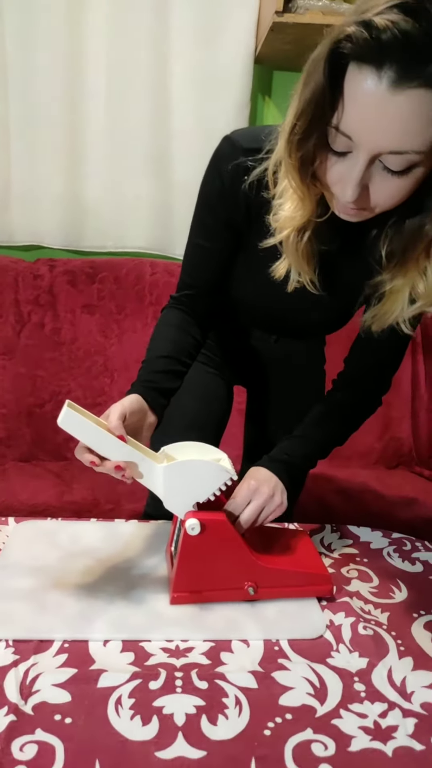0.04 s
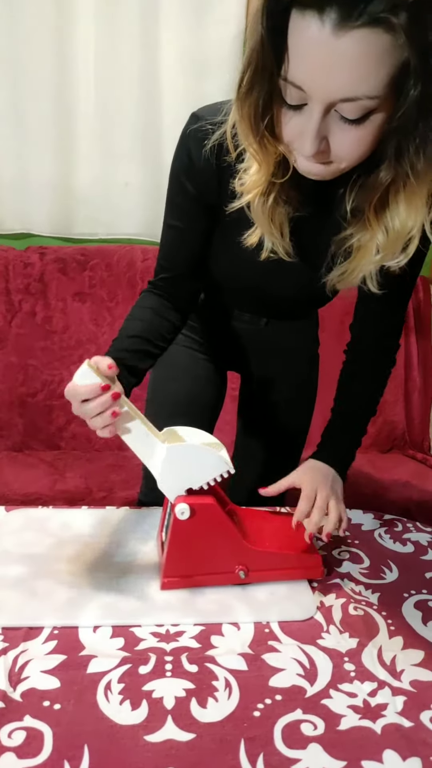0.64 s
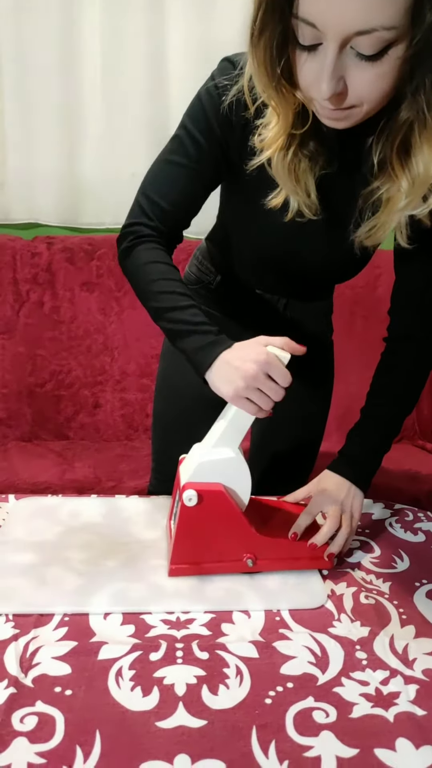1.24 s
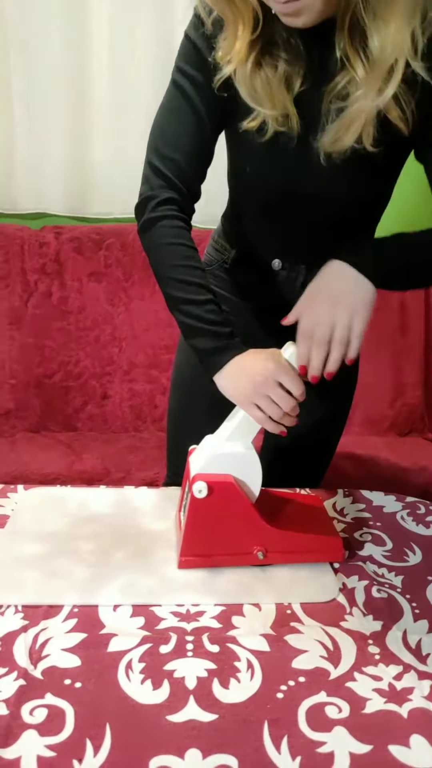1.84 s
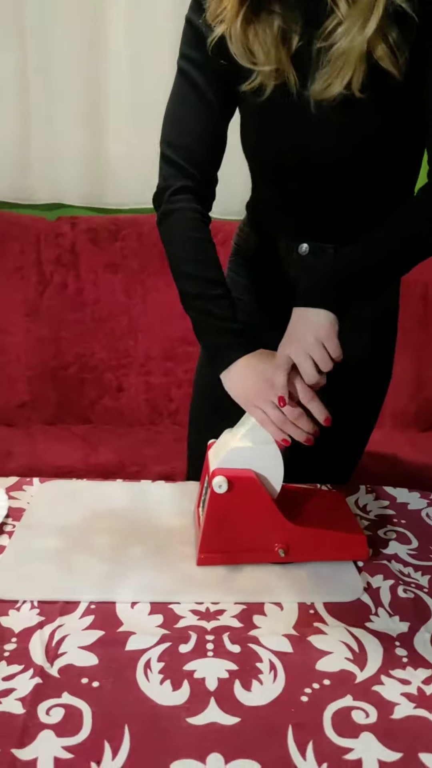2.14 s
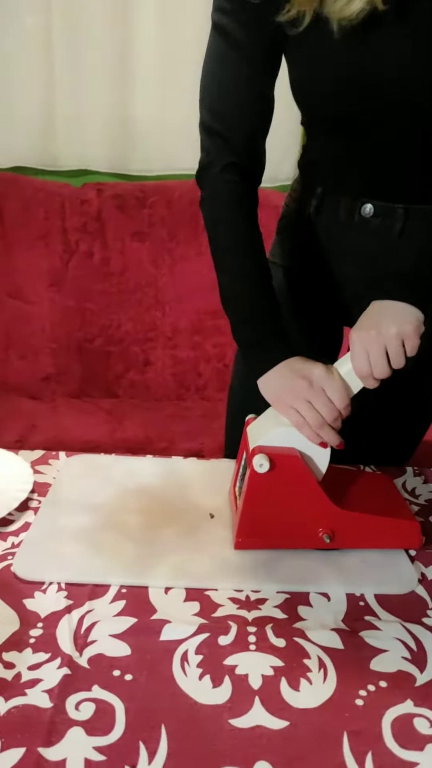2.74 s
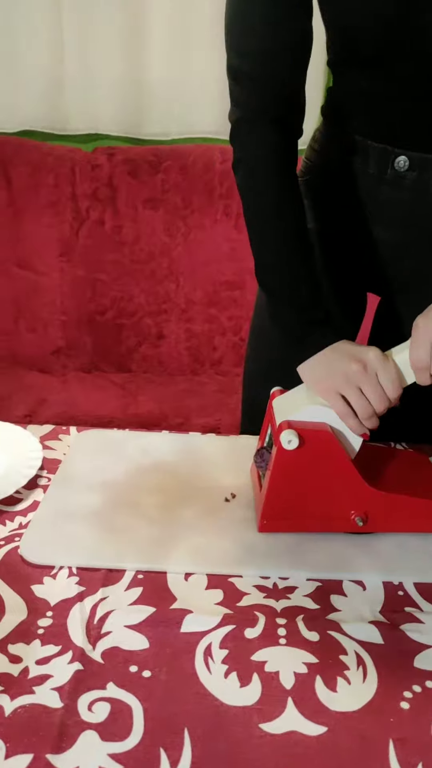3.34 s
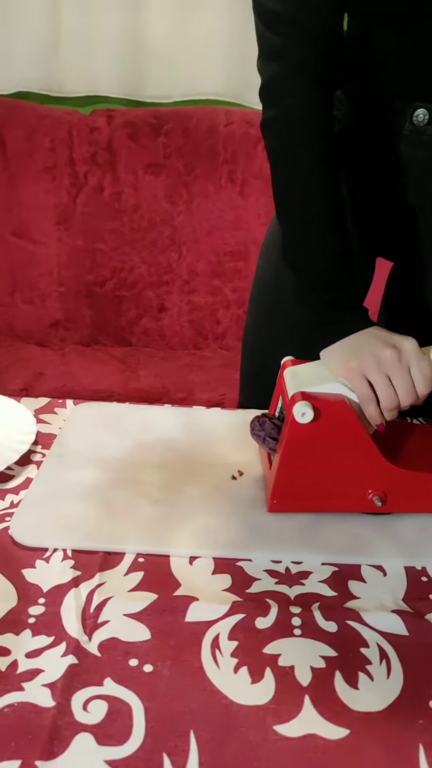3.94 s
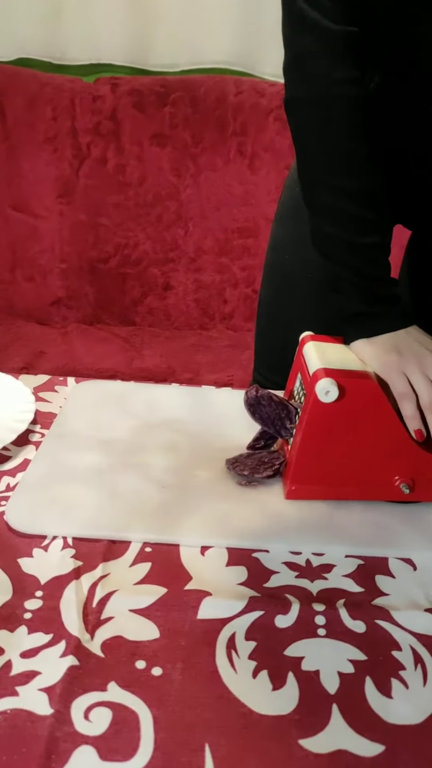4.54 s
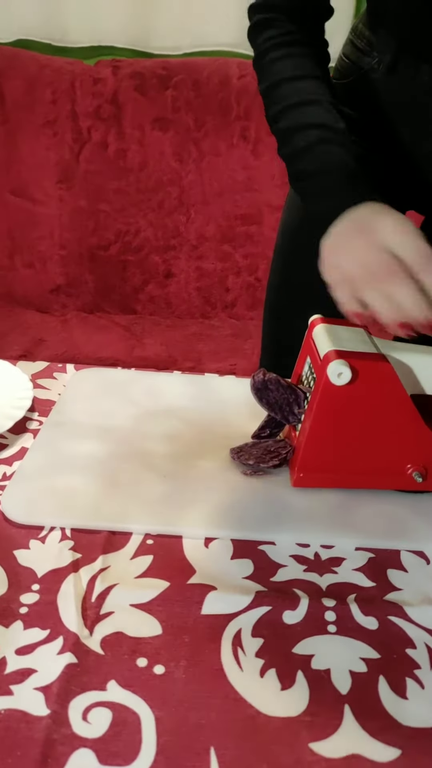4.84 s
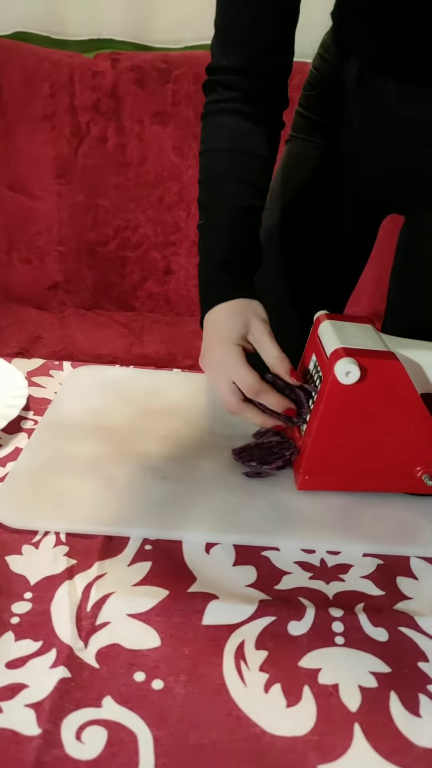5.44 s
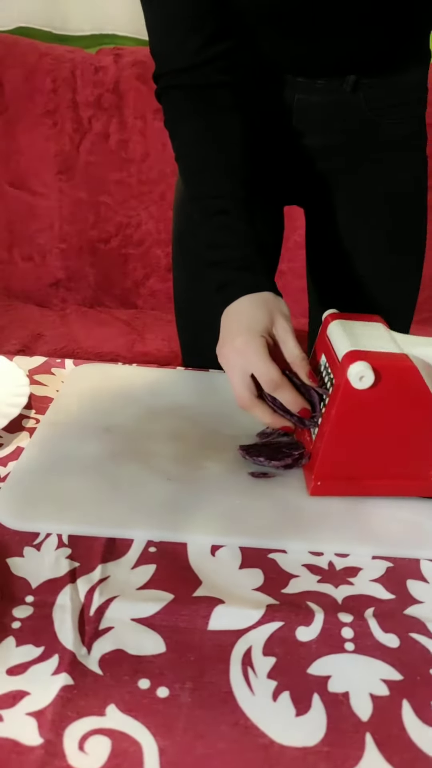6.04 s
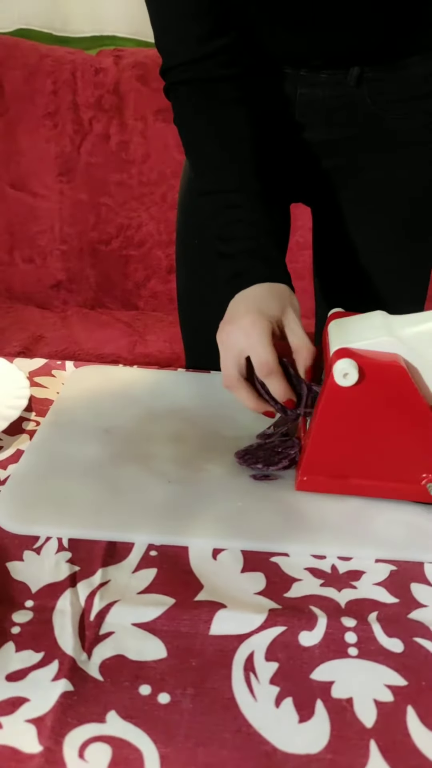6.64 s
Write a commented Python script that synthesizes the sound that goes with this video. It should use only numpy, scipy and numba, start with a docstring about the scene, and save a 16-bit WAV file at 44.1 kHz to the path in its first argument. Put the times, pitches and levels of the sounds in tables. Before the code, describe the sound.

A plastic lever cutter is heard close up on a table in a small, quiet living room that rings briefly. It starts with a light hollow knock, and a few more knocks, ticks and faint scrapes come around 1 to 1.7 seconds as the lever is seated. From about 2.4 seconds a raw potato begins giving way on the blades with a thud and short wet crunches, then a brief groan near 2.8. The loudest jolts come at 3.1 and 3.7 seconds, each a sharp thud with a juicy crunch, a frame shudder and a low table thump, with faint rubbing between. Smaller crunching slips follow around 4 to 4.2. After a quieter stretch with a faint squeak, a plastic knock and click sound at 5.7. Until about 6.6 seconds fingers pluck at the cut sticks with soft taps, ticks, rubbing and a faint creak.

```python
"""Small living room: close by, a plastic lever cutter on a table forces a raw potato through its blades.
The lever knocks as it is seated. The potato groans on the grid and gives way in slips that thud,
shake the frame and thump the table, while its cells burst with a wet crunch.
Then fingers pluck at the cut sticks. The room rings briefly."""
import sys
import numpy as np
from scipy import signal
from scipy.fft import rfft, irfft
from scipy.io import wavfile
from scipy.ndimage import uniform_filter1d, minimum_filter1d
from numba import njit

SR = 44100
rng = np.random.default_rng(int(sys.argv[2]) if len(sys.argv) > 2 else 0)


def pcm_store(signal):
    """Save signal as 16-bit PCM."""
    levels = np.round(np.clip(np.atleast_2d(signal), -1, 1) * 32767)
    wavfile.write(sys.argv[1], SR, levels.astype(np.int16).T)


N = 294588

# Event levels are relative, ahead of each layer's gain.
# potato slips: t/s, length/s, thud/dB, shudder/dB, crunch/dB, fizz/dB
POTATO_SLIPS = [(2.431, 0.029, -15, -19, -34, -45), (2.479, 0.026, -49, -33.5, -32.5, -37),
                (2.575, 0.023, -31.5, -35.5, -28.5, -34.5), (2.75, 0.053, -52.5, -49.5, -36.5, -37.5),
                (2.945, .018, -63, -67.5, -51, -46.5), (3.082, 0.022, -0.5, -7.5, -14.5, -30.5),
                (3.126, 0.017, -18, -19.5, -31, -43), (3.709, 0.033, -1, -10, -22, -29.5),
                (3.824, 0.026, -21, -20.5, -33.5, -43.5), (4.038, 0.071, -11, -19, -28.5, -35),
                (4.149, 0.012, -14.5, -23, -31.5, -34)]
# lever and frame knocks: t/s, level/dB, f/Hz, shudder/dB, scrape/dB
LEVER_KNOCKS = [(.118, -27, 443, -38.5, -44.5), (0.273, -53.5, 477, -54.5, -75),
                (.463, -52, 910, -68, -56.5), (.889, -45.5, 527, -57, -77), (1.053, -41, 1180, -52, -45.5),
                (1.093, -32.5, 488, -49, -49.5), (1.138, -31.5, 480, -34.5, -49),
                (1.395, -45, 496, -51, -62), (4.671, -37.5, 500, -53.5, -71), (5.716, -24.5, 463, -27, -44)]
# spectrum of juicy fizz, hiss and tick edges: f/Hz, level/dB
FIZZ_SPECTRUM = [(1000, -30.5), (3000, -4.5), (3700, -9), (4700, -3), (5900, -6.5), (7600, 3.5), (8900, 1),
                 (9700, -15.5), (12000, -22), (15500, -28.5)]
# friction spectrum: f/Hz, level/dB
RUB_SPECTRUM = [(100, -3.5), (300, -4), (520, -2.5), (1100, 2.5), (1700, -5.5), (2500, -4), (3400, -23),
                (8000, -28.5), (12000, -45.5)]


def jolts(tail):
    """Each slip lurches the lever: a thud, higher when harder, a table thump and a frame shudder."""
    # table modes: f/Hz, level/dB, t60/s
    table_modes = [(52.4, -6, 0.22), (95.7, -1, .26), (155, 5, 0.18)]
    stroke_end_s, lean_db_per_s = 4.6, 3  # weight on the table grows through the stroke
    thuds, shake, thumps = np.zeros((3, N))
    t = seconds(.3)
    thump = sum(amp(db) * bump(hz, t60_s, push_s=.012) for hz, db, t60_s in table_modes)
    for s, length_s, db, shudder_db, _, _ in POTATO_SLIPS:
        thud_hz = 825 * 2 ** (.021 * db)
        add(thuds, s, amp(db) * bump(thud_hz, t60_s=.011, push_s=.0028))
        shudder_s = .024 + .81 * length_s
        add(shake, s, amp(shudder_db) * np.tanh(t / .0027) * np.exp(-2 * t / shudder_s))
        thump_db = -29 + .57 * db - lean_db_per_s * (stroke_end_s - s)
        add(thumps, s, amp(thump_db) * thump)
    body, ringing = frame(shake * grains(per_s=2500, scatter_db=4), modes_db=-5)
    return in_room(thuds, tail, wet_db=-7) + in_room(body, tail, wet_db=-6) + ringing + thumps


def tearing(tail):
    """Cells burst on the blades in clusters: coarse crunch and a fine spray of juicy clicks."""
    crunch_rows = [(s, length_s, db) for s, length_s, _, _, db, _ in POTATO_SLIPS]
    fizz_rows = [(s, length_s, db) for s, length_s, _, _, _, db in POTATO_SLIPS]
    crunch_envelope = tear_envelope(crunch_rows, attack_s=.0027, strain_db=-14.5, snap_db=-8)
    fizz_envelope = tear_envelope(fizz_rows, attack_s=.004, strain_db=-27, snap_db=3.5)
    clusters = cell_clusters(per_s=300, spread_db=7)
    coarse = crunch_envelope * clusters * grains(per_s=900, scatter_db=2)
    spray = fizz_envelope * clusters * grains(per_s=600, scatter_db=7)
    # tearing flesh: f/Hz, level/dB
    crunch_spectrum = [(100, -15), (300, -5.5), (700, -1.5), (1300, -6), (1900, -1.5), (2600, -1.5),
                       (3300, -17.5), (5000, -22), (9000, -28), (12000, -54)]
    crunch = amp(-9) * convolve(coarse, colour(crunch_spectrum))
    fizz = amp(-5) * convolve(spray, colour(FIZZ_SPECTRUM))
    return in_room(crunch, tail, wet_db=5) + in_room(fizz, tail, wet_db=2.5)


def tear_envelope(rows, attack_s, strain_db, snap_db):
    """Flesh strains, snaps, rips during the slip, then settles. Rows: t/s, length/s, level/dB."""
    lead_s, strain_s, snap_s, release_s = .06, .011, .0028, .007
    envelope = np.zeros(N)
    t = seconds(.4) - lead_s
    after = t.clip(0)
    for s, length_s, db in rows:
        strain = amp(strain_db) * np.exp(-np.abs(t) / strain_s)
        snap = amp(snap_db) * (t > 0) * np.exp(-after / snap_s)
        rip = np.tanh(after / attack_s) * np.exp(-(t - length_s).clip(0) / release_s)
        add(envelope, s - lead_s, amp(db) * (strain + snap + rip))
    return envelope


def cell_clusters(per_s, spread_db):
    """Cells fail in groups: a gain that jumps at random moments, rms 1."""
    cluster = np.cumsum(rng.random(N) < per_s / SR)
    gain = amp(spread_db * rng.uniform(-1, 1, N))[cluster]
    return gain / np.sqrt(np.mean(gain ** 2))


def ticks_and_cracks(tail):
    """Plastic ticks, and a crack opens each slip: noise in a fast-dying resonance, bright-edged."""
    # hard plastic ticks: t/s, level/dB, f/Hz
    plastic_ticks = [(.463, -40.5, 1400), (1.053, -40, 4500), (1.451, -35, 2100), (1.740, -38.5, 1530),
                     (2.074, -51, 3400), (5.715, -23.5, 1210), (5.928, -36.5, 4120), (6.438, -47.5, 3400)]
    crack_hz, crack_re_thud_db = 1170, -6.5
    rows = plastic_ticks + [(s, db + crack_re_thud_db, crack_hz) for s, _, db, _, _, _ in POTATO_SLIPS]
    clicks, edges = np.zeros((2, N))
    t = seconds(.01)
    for s, db, hz in rows:
        burst = rng.standard_normal(len(t)) * np.exp(-t / .0016)
        tick = signal.fftconvolve(burst, ring(hz, t60_s=3 / hz))
        add(clicks, s, amp(db) * tick / np.abs(tick).max())
        add(edges, s, amp(db) * burst)
    return in_room(clicks + amp(-18) * convolve(edges, colour(FIZZ_SPECTRUM)), tail, wet_db=-11.5)


def knocks(tail):
    """The lever meets its seat or the potato: a hollow knock and a brief shudder."""
    hits, shake = np.zeros((2, N))
    for s, db, hz, shudder_db, _ in LEVER_KNOCKS:
        add(hits, s, amp(db) * bump(hz, t60_s=.038, push_s=.0018))
        add(shake, s, amp(shudder_db) * np.exp(-seconds(.11) / .011))
    body, ringing = frame(shake * grains(per_s=3300, scatter_db=.5), modes_db=-7)
    return in_room(hits + body, tail, wet_db=-2) + ringing


def frame(force, modes_db):
    """The loose-jointed frame under a force: dull broadband body and ringing modes."""
    # frame modes: f/Hz, level/dB
    frame_modes = [(157, 1), (199, -4), (288, -6), (344, -1.5), (457, 5.5), (512, -3), (648, -4), (716, -7),
                   (862, -1), (930, -6), (1020, -7.5), (1421, -14), (1528, -5.5), (1671, -23.5),
                   (1825, -16.5), (1912, -7.5), (2324, -15), (2606, -11.5)]
    # broadband frame response: f/Hz, level/dB
    shudder_spectrum = [(30, -37), (80, -21), (125, -1.5), (200, 1.5), (280, -6), (600, -7.5), (1000, -2),
                        (1350, -14.5), (1900, -7.5), (2600, -22.5), (3300, -37), (8000, -36.5),
                        (11000, -65)]
    modes = sum((-1) ** k * amp(db) * ring(hz, t60_s=.25) for k, (hz, db) in enumerate(frame_modes))
    return convolve(force, colour(shudder_spectrum)), amp(modes_db) * convolve(force, unit(modes))


def taps(tail):
    """Fingers and limp potato sticks bump the frame and board; low taps ring longer."""
    # soft taps: t/s, level/dB, f/Hz
    soft_taps = [(1.405, -49, 162), (1.96, -53, 170), (5.131, -46, 400), (5.694, -44.5, 594),
                 (5.931, -25, 549), (6.012, -24, 530), (6.019, -31, 189.5), (6.173, -27.5, 561),
                 (6.251, -31.5, 860), (6.345, -29.5, 624), (6.444, -37.5, 756), (6.508, -39, 480),
                 (6.571, -44.5, 187)]
    sound = np.zeros(N)
    for s, db, hz in soft_taps:
        t60_s = .013 * (547 / hz) ** 1.78
        add(sound, s, amp(db) * bump(hz, t60_s, push_s=.0033))
    return in_room(sound, tail, wet_db=-5.5)


def groans(tail):
    """Uneven stick-slip pulses ring one resonance per groan or squeak."""
    # potato on blades, fingers on lever and wet sticks: t/s, length/s, level/dB, f/Hz
    stick_slips = [(1.282, .036, -41, 620), (1.83, 0.032, -62, 2170), (2.315, 0.025, -49, 940),
                   (2.752, .043, -30, 935), (4.795, 0.21, -56, 2266), (6.142, 0.032, -39, 650),
                   (6.27, 0.33, -47.5, 528)]
    t60_cycles = 16
    pulses = grains(per_s=1600, scatter_db=1)
    sound = np.zeros(N)
    for s, length_s, db, hz in stick_slips:
        gated = pulses * bursts([(s, length_s, db)], edge_s=.0022)
        drive = gated[int(s * SR):int((s + length_s) * SR)]
        add(sound, s, signal.fftconvolve(drive, unit(ring(hz, t60_cycles / hz))))
    return in_room(amp(-6.5) * sound, tail, wet_db=-3.5)


def rubbing(tail):
    """Light friction, in strokes and after each knock: a grainy scrape under a thin hiss."""
    # plastic, potato and hands sliding: t/s, length/s, scrape/dB, hiss/dB
    slides = [(.093, .026, -54.5, -62), (1.246, .13, -55, -62), (1.527, 0.14, -62, -70),
              (1.83, 0.95, -81, -73.5), (2.39, 0.073, -51, -53), (2.96, 0.33, -61, -58.5),
              (3.352, 0.27, -59, -57.5), (4.332, 0.037, -49, -80), (4.797, .22, -70, -69.5),
              (5.21, 0.5, -68, -73), (5.926, 0.017, -42.5, -47), (6.132, 0.045, -52.5, -59.5),
              (6.216, .16, -61, -70), (6.429, 0.11, -53, -69.5)]
    knock_slide_s, hiss_re_scrape_db = .03, -8
    strokes = slides + [(s, knock_slide_s, db, db + hiss_re_scrape_db) for s, *_, db in LEVER_KNOCKS]
    scrape_envelope = bursts([(s, length_s, db) for s, length_s, db, _ in strokes], edge_s=.00285)
    hiss_envelope = bursts([(s, length_s, db) for s, length_s, _, db in strokes], edge_s=.0048)
    scrape = convolve(scrape_envelope * grains(per_s=790, scatter_db=4.5), colour(RUB_SPECTRUM))
    hiss = convolve(hiss_envelope * grains(per_s=3400, scatter_db=10), colour(FIZZ_SPECTRUM))
    return in_room(amp(-5.5) * scrape + amp(-2) * hiss, tail, wet_db=3)


def fumbling(tail):
    """Shifting fingers and loose parts click faintly at random."""
    per_s, spread_db = 9, 3.5
    onsets = rng.random(N) < per_s / SR
    clicks = onsets * amp(-44.5 + spread_db * rng.uniform(-1, 1, N))
    return in_room(convolve(clicks, colour(RUB_SPECTRUM)), tail, wet_db=-1.5)


def room_tail(build_s, alike_hz):
    """Dense reflections at two microphone ports, alike in the bass, unrelated in the treble."""
    # room decay: f/Hz, t60/s
    decay_times = [(100, 0.31), (260, 0.26), (700, 0.29), (1840, 0.28), (4850, 0.3), (12000, 0.26)]
    t = seconds(.7)
    hz = np.fft.rfftfreq(len(t), 1 / SR)
    mid, side = rfft(rng.standard_normal((2, len(t))))
    coherence = 1 / (1 + (hz / alike_hz) ** 2)
    field = mid * np.sqrt(1 + coherence) + side * np.sqrt(1 - coherence) * np.array([[1], [-1]])
    centres_hz = np.geomspace(100, 14000, 15)
    tail = 0
    for centre_hz, weights in zip(centres_hz, np.eye(len(centres_hz))):
        band = irfft(field * lookup(np.c_[centres_hz, weights], hz), len(t))
        tail = tail + band * np.exp(-np.log(1000) * t / lookup(decay_times, centre_hz))
    build = np.tanh((t / build_s) ** 2)
    return unit(even_out(tail * build, width_hz=17.7) * build)


def even_out(x, width_hz):
    """Flatten the spectrum: overlapping room modes favour no pitch."""
    n = x.shape[-1]
    spectrum = rfft(x, 2 * n)
    power = uniform_filter1d(np.abs(spectrum) ** 2, size=int(width_hz * 2 * n / SR))
    return irfft(spectrum / np.sqrt(np.abs(power)))[:, :n]


def in_room(x, tail, wet_db, left_lag_s=.0003):
    """Direct sound, right port first, plus reflections."""
    x = np.ravel(x)
    direct = np.array([np.roll(x, int(left_lag_s * SR)), x])
    return direct + amp(wet_db) * convolve(x, tail)


def quiet_room():
    """Still air and a faint, wavering low hum."""
    # room noise: f/Hz, level/dB
    air_spectrum = [(12, -35.5), (20, 1), (59, 0.5), (109, -7.5), (452, -9.5), (505, -14), (1380, -23),
                    (1580, -15.5), (1720, -21.5), (2680, -22.5), (4190, -33.5), (7310, -28.5), (8880, -29),
                    (9930, -44.5), (15500, -60)]
    hum_hz, half_width_hz = 47.8, 3
    hz = np.fft.rfftfreq(N, 1 / SR)
    mid, side = rfft(rng.standard_normal((2, N)))
    width = np.clip(hz / 900, .3, 1) * np.array([[1], [-1]])
    air = irfft((mid + side * width) * amp(lookup(air_spectrum, hz)), N)
    hum = irfft(rfft(rng.standard_normal(N)) / (1 + ((hz - hum_hz) / half_width_hz) ** 2), N)
    return np.sqrt(N) * (amp(-63) * unit(air) + amp(-65.5) * unit(hum))


def ring(hz, t60_s):
    """One damped vibration."""
    t = seconds(.5)
    return np.sin(2 * np.pi * hz * t) * np.exp(-np.log(1000) * t / t60_s)


def bump(hz, t60_s, push_s):
    """Cushioned blow: vibration builds during the push; peak 1."""
    y = ring(hz, t60_s) * (1 - np.exp(-(seconds(.5) / push_s) ** 2))
    return y / np.abs(y).max()


def grains(per_s, scatter_db):
    """Tiny random clicks of uneven size, rms near 1."""
    onsets = rng.random(N) < per_s / SR
    clicks = onsets * rng.choice([-1, 1], N) * amp(scatter_db * rng.standard_normal(N))
    return clicks / np.sqrt(uniform_filter1d(clicks ** 2, size=700).clip(0) + 1e-6)


def bursts(rows, edge_s):
    """Burst envelope, softer-edged when longer. Rows: t/s, length/s, level/dB."""
    envelope = np.zeros(N)
    for s, length_s, db in rows:
        t = seconds(length_s)
        fade_s = edge_s + length_s ** 2 / 2.7
        add(envelope, s, amp(db) * np.tanh(t / fade_s) * np.tanh((length_s - t) / fade_s))
    return envelope


def colour(points, size=4096):
    """Minimum-phase response of unit energy. Points: f/Hz, level/dB."""
    gain = amp(lookup(points, np.fft.rfftfreq(size, 1 / SR)))
    cepstrum = irfft(np.log(gain))
    cepstrum[1:size // 2] *= 2
    cepstrum[size // 2 + 1:] = 0
    return unit(irfft(np.exp(rfft(cepstrum))))


def lookup(points, hz):
    """Interpolate over log frequency. Points: f/Hz, value."""
    points_hz, values = np.transpose(points)
    return np.interp(np.log(np.maximum(hz, 1)), np.log(points_hz), values)


def amp(db):
    return 10 ** (np.asarray(db) / 20)


def unit(x):
    """Scale to unit energy."""
    return x / np.sqrt(np.sum(x ** 2, axis=-1, keepdims=True))


def seconds(length_s):
    return np.arange(int(length_s * SR)) / SR


def convolve(x, response):
    return signal.fftconvolve(np.atleast_2d(x), np.atleast_2d(response), axes=-1)[:, :N]


def add(track, start_s, sound):
    i = max(int(start_s * SR), 0)
    track[i:i + len(sound)] += sound[:N - i]


@njit
def hold_peaks(x, fall):
    """Peak follower: instant rise, exponential fall."""
    held, level = np.empty(len(x)), 0.
    for i in range(len(x)):
        level = max(x[i], level * fall)
        held[i] = level
    return held


def limiter(x, ceiling, release_s):
    """Duck one channel just ahead of a peak over the ceiling, then recover."""
    excess = np.log(np.maximum(np.abs(x) / ceiling, 1))
    look_ahead = -minimum_filter1d(-excess, size=129)
    cut = hold_peaks(look_ahead, np.exp(-1 / (release_s * SR)))
    return x * np.exp(-uniform_filter1d(cut, size=129))


def scene():
    """Cutter, potato and hands in one room, over its noise floor."""
    tail = room_tail(build_s=.0012, alike_hz=604)
    cutting = jolts(tail) + tearing(tail) + groans(tail)
    contacts = knocks(tail) + taps(tail) + ticks_and_cracks(tail) + rubbing(tail) + fumbling(tail)
    return amp(-1.5) * (cutting + contacts + quiet_room())


def record(dry):
    """Left port keener below the treble; a limiter per channel, so hard jolts duck the left; low-pass."""
    # port balance: f/Hz, left minus right/dB
    balance = [(60, 9.5), (200, 10), (420, 9), (750, 8.5), (1290, 14), (2380, 11.5), (4400, -3.5),
               (8000, -3), (15000, 8.5)]
    cutoff_hz = 15750
    port_db = lookup(balance, np.fft.rfftfreq(N, 1 / SR)) * np.array([[.5], [-.5]])
    ports = irfft(rfft(dry) * amp(port_db), N)
    limited = np.array([limiter(port, ceiling=.88, release_s=.056) for port in ports])
    return signal.sosfilt(signal.ellip(10, .2, 80, cutoff_hz, fs=SR, output="sos"), limited)


dry = scene()
out = record(dry)
pcm_store(out)
```